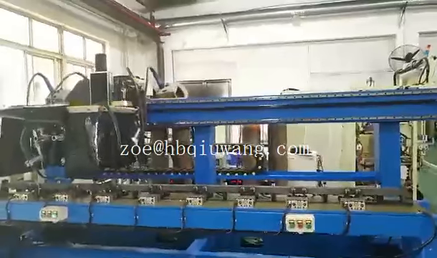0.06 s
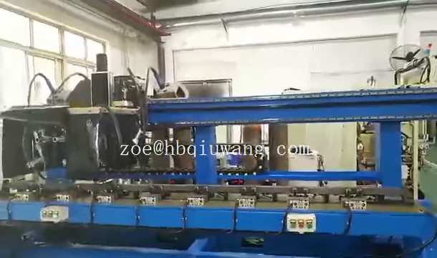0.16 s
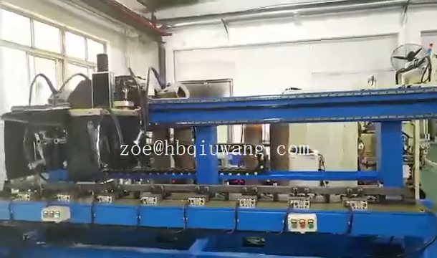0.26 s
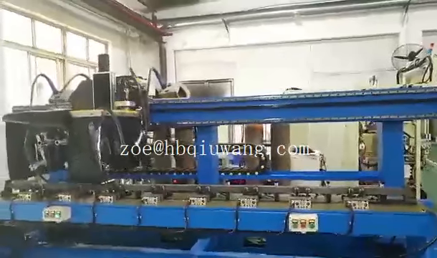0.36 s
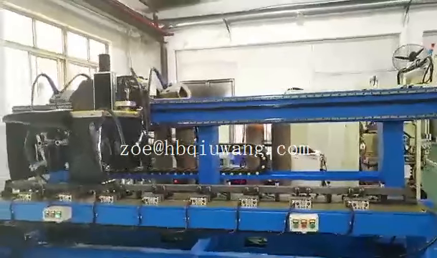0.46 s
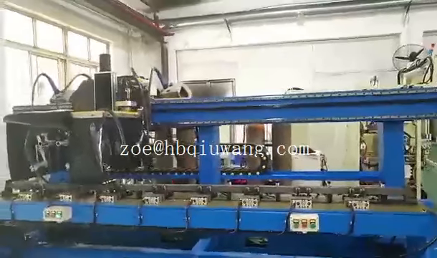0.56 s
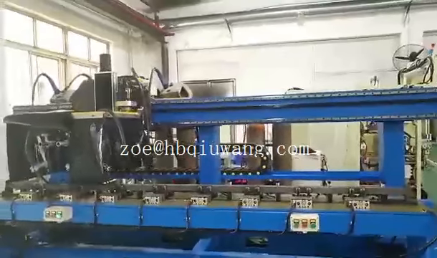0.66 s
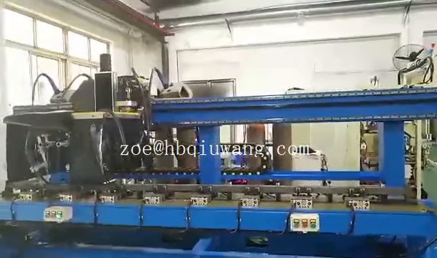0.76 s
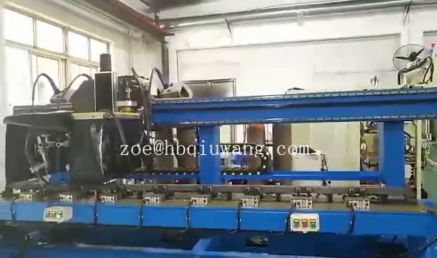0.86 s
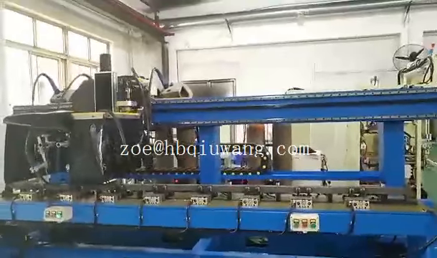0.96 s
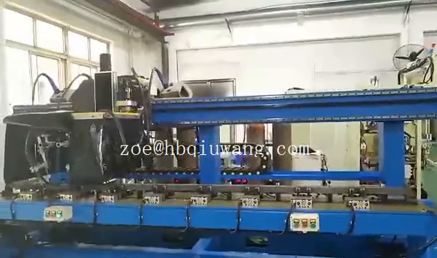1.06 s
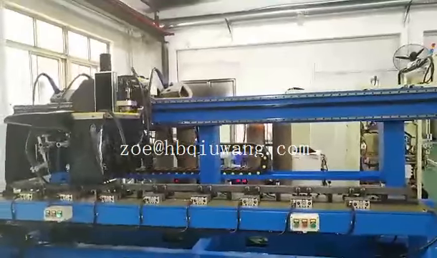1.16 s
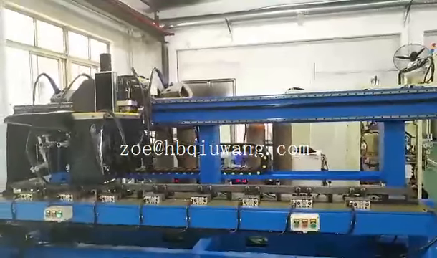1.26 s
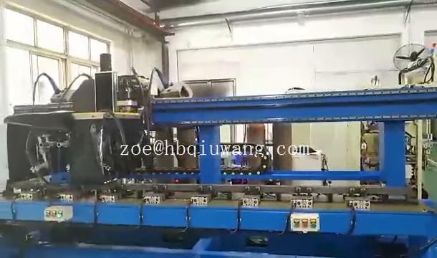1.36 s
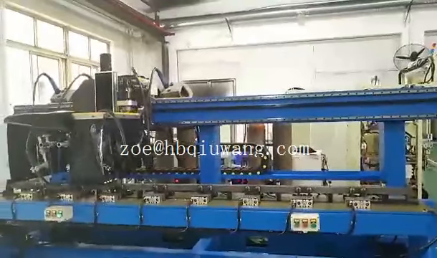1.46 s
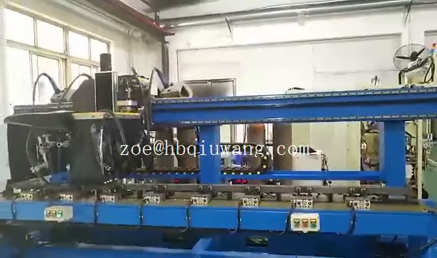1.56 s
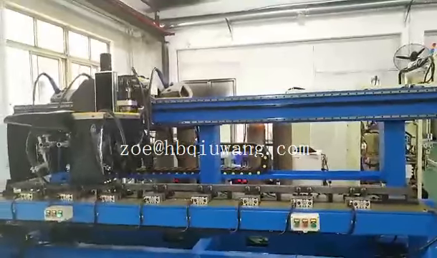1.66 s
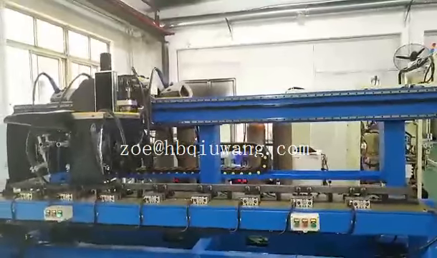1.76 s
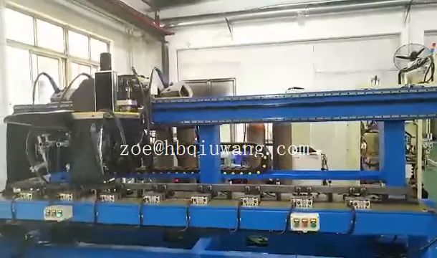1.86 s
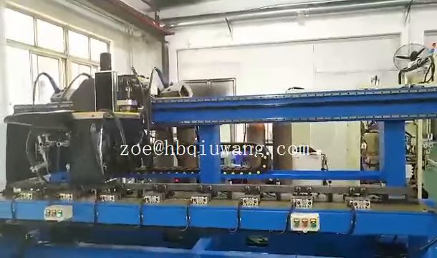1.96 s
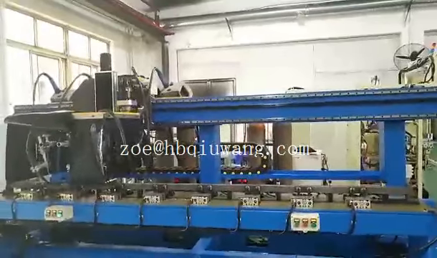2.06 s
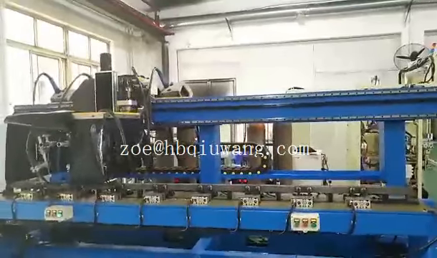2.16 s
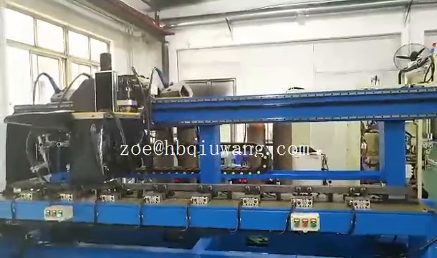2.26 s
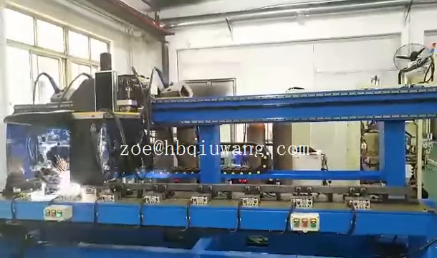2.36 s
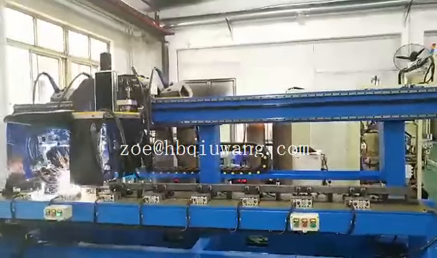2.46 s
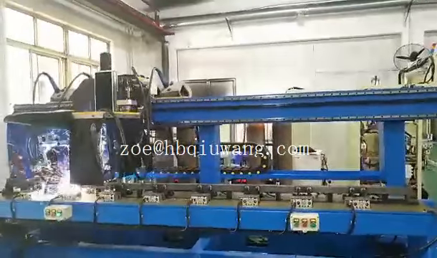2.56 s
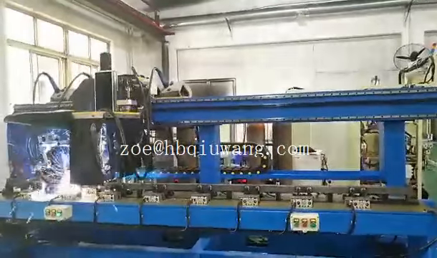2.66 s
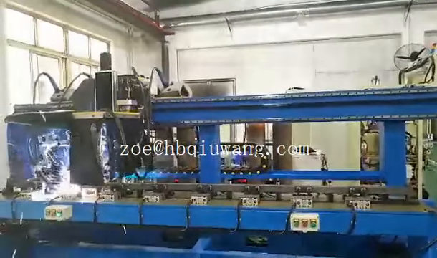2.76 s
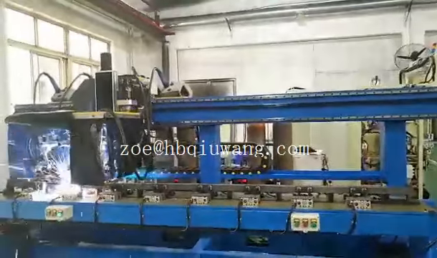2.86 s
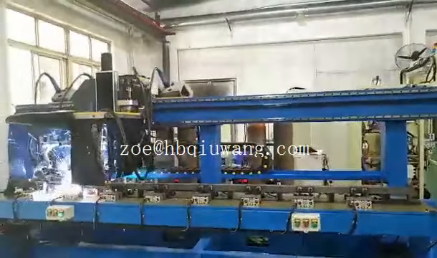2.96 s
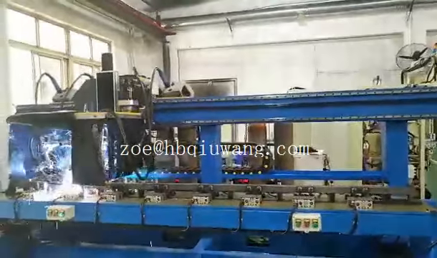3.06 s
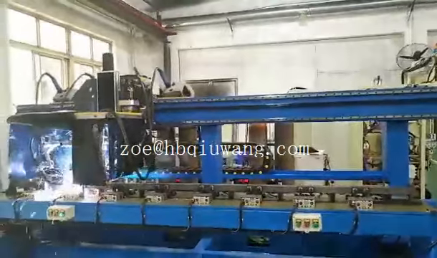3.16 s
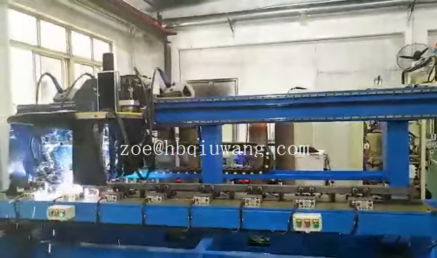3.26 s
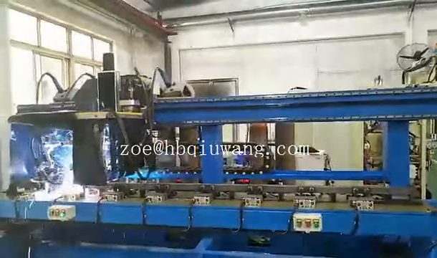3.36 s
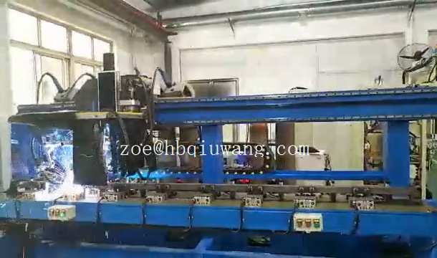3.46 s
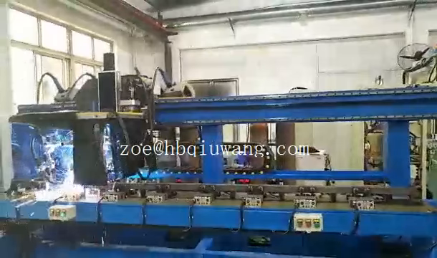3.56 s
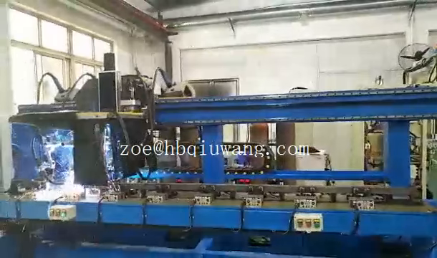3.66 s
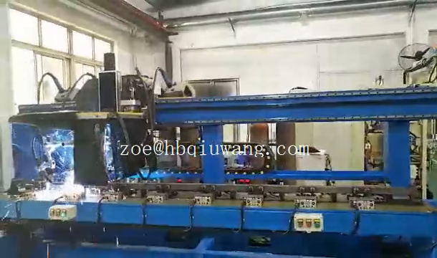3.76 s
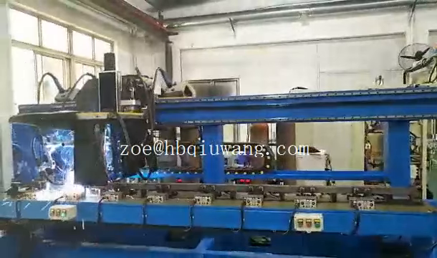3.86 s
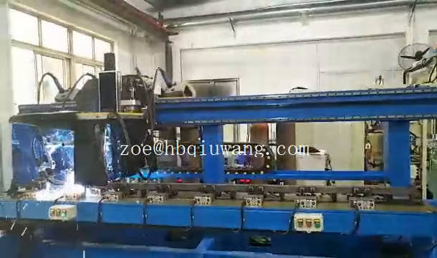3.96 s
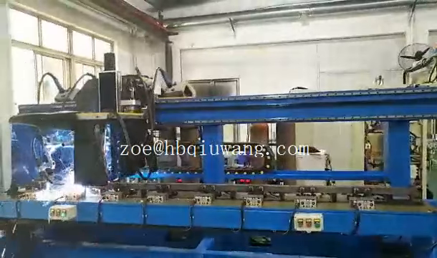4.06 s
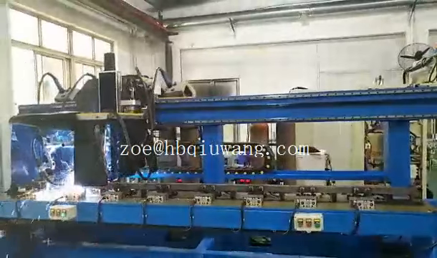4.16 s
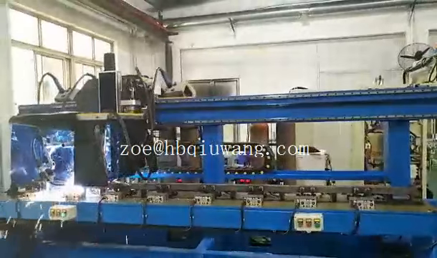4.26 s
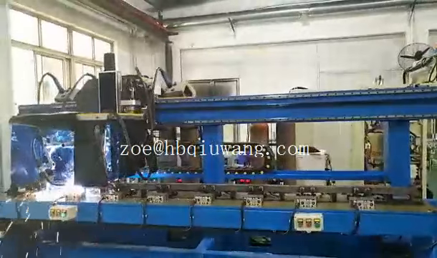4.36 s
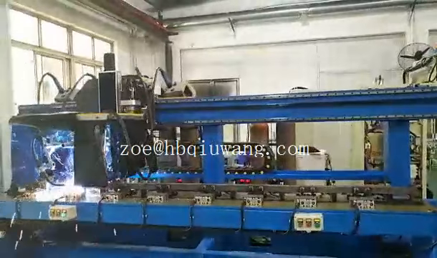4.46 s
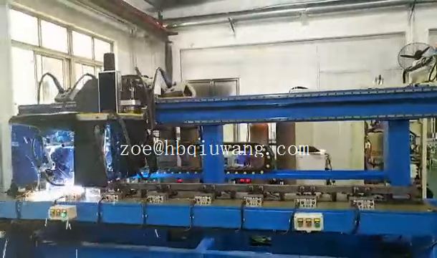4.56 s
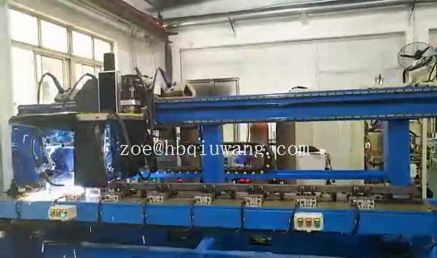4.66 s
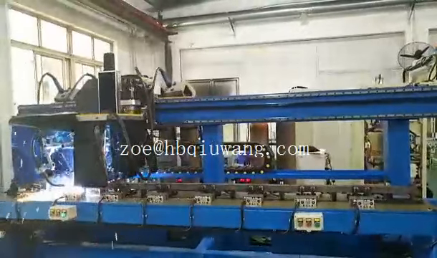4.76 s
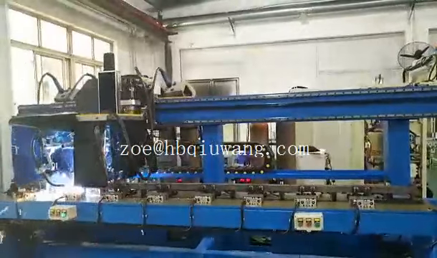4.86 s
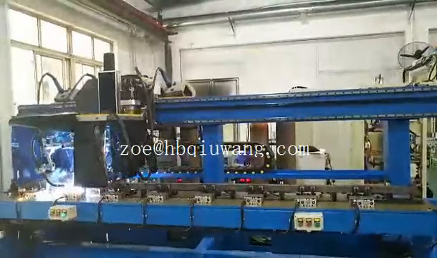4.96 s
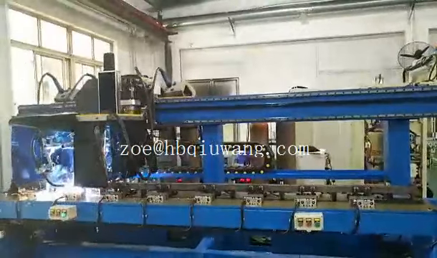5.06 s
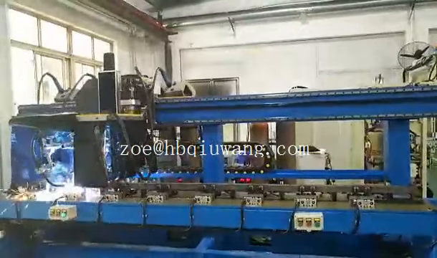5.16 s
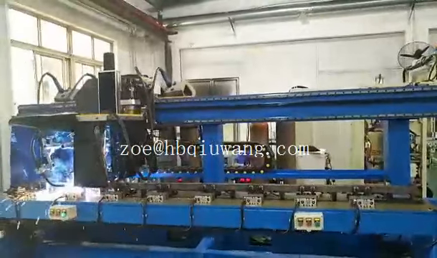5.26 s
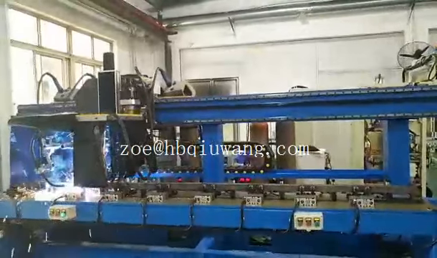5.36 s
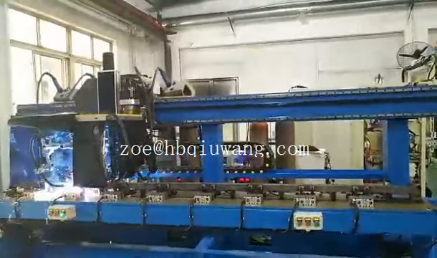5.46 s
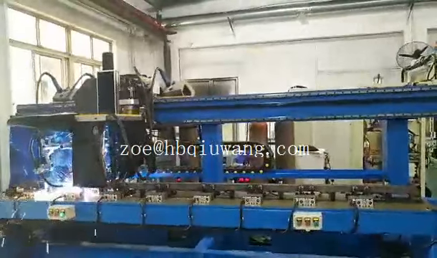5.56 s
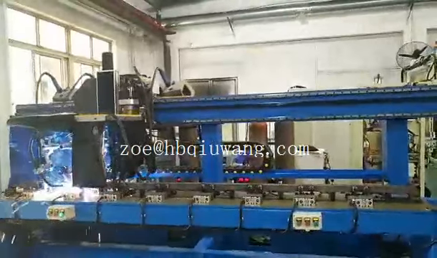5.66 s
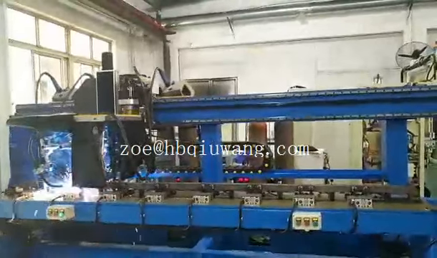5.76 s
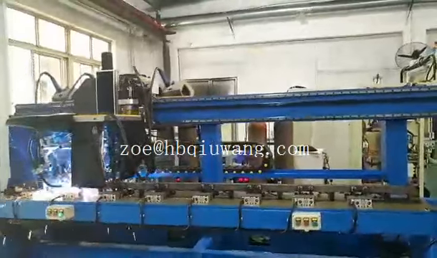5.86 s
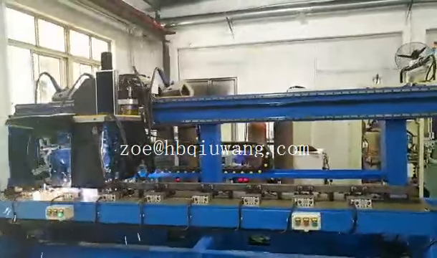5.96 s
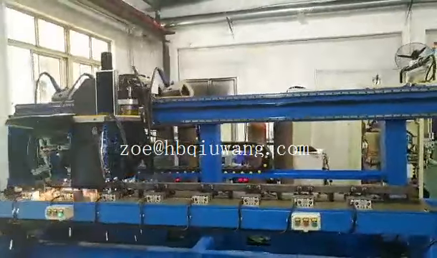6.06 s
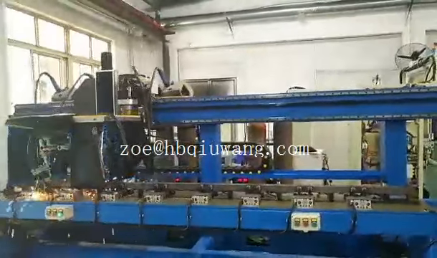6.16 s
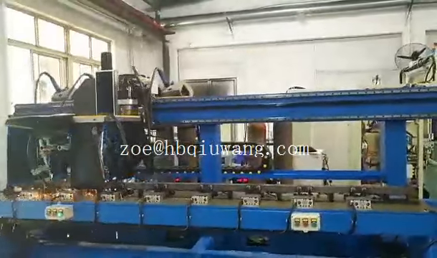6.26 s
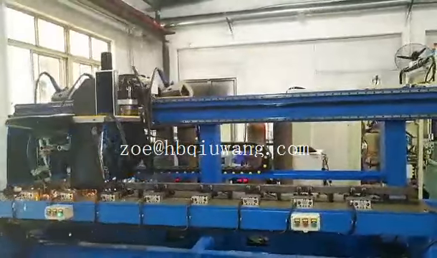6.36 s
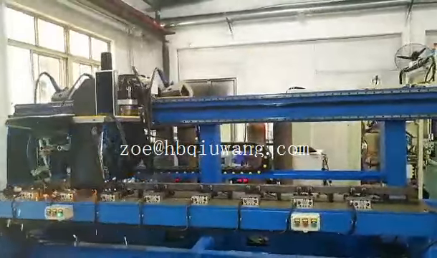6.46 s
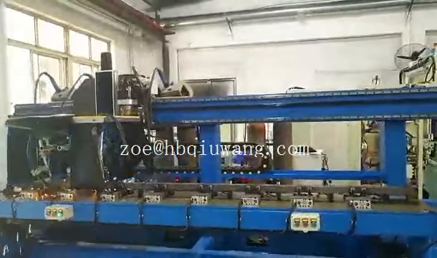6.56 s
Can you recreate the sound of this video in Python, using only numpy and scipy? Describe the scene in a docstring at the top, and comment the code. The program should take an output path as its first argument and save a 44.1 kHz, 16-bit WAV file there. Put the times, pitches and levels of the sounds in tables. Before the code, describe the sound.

Heard a few metres from an automatic welder in a reverberant hall: low steady hum and rumble with soft scrapes at first, then a thud-like valve pop, a breath of gas and an abrupt burst of harsh electric crackling with hard snaps and brief metallic rings. It drops suddenly to a thinner, even sizzle with occasional spits, which ends in a small pop, a short hall echo and faint hum.

```python
"""An automatic welding machine a few metres away in a factory hall, where a motor hums throughout.
First come strokes of far-off scraping and one brief dip in level; then a gas valve pops and hisses.
Two torches strike up. Their wires keep shorting, and each short is a crack: a snap and a spray of noise,
coloured by the steel frame and echoed by the hall. The loud torch stops first; the quiet one burns on
and breaks off with a pop, and a trickle of gas remains. All of it is shaped noise, spikes and sine tones."""
import sys
import numpy as np
from scipy import signal
from scipy.fft import rfft, irfft
from scipy.io import wavfile
from scipy.ndimage import uniform_filter1d

SR = 44100
rng = np.random.default_rng(int(sys.argv[2]) if len(sys.argv) > 2 else 0)


def dump_mix(stems):
    """Bounce the given channels to the path in sys.argv[1] as a 16-bit WAV at rate SR."""
    frames = np.atleast_2d(stems).T  # one column per channel
    limited = np.clip(frames, -1, 1)  # hard clip at full scale
    pcm = np.round(limited * 32767).astype(np.int16)
    wavfile.write(sys.argv[1], SR, pcm)


N = 290795
TIME = np.arange(N) / SR  # seconds

# when each arc burns: lit and out, in seconds
LOUD_BURN, QUIET_BURN = (2.275, 4.204), (2.3, 5.922)
# how far (dB) and how fast (steps per second) the treble of both arcs flickers
TREBLE_FLICKER_DB, TREBLE_FLICKER_PER_S = 1.3, 32


def undb(db):
    """Decibels to gain."""
    return 10 ** (np.asarray(db) / 20)


def unit(x):
    """Scale to rms 1."""
    return x / np.sqrt(np.mean(x ** 2))


def noise():
    """Plain white noise of rms near 1."""
    return rng.standard_normal(N)


def curve(rows):
    """Gain through time from rows of seconds and dB."""
    return undb(np.interp(TIME, *np.transpose(rows)))


def walk(rate):
    """Smooth random wander with a spread near 1, taking `rate` new steps per second."""
    k = int(SR / rate)
    steps = np.repeat(rng.standard_normal(N // k + 2), k)
    smooth = uniform_filter1d(uniform_filter1d(steps, k), k)
    return 1.5 * smooth[:N]


def bump(centre_s, width_s):
    """A soft rise and fall that peaks at 1."""
    return np.exp(-((TIME - centre_s) / width_s) ** 2)


def burning(span, ramp_s):
    """1 while an arc is lit, with short ramps."""
    ramp_up = np.clip((TIME - span[0]) / ramp_s, 0, 1)
    ramp_down = np.clip((span[1] - TIME) / ramp_s + 1, 0, 1)
    return ramp_up * ramp_down


def held(start_s, end_s, attack_s, fall_db_per_s):
    """Gain that ramps up, holds, then dies away."""
    attack = np.clip((TIME - start_s) / attack_s, 0, 1)
    return attack * undb(-fall_db_per_s * np.maximum(TIME - end_s, 0))


def impulses(times, sizes):
    """One spike of the given size at each time."""
    return np.bincount((np.asarray(times) * SR).astype(int), sizes, N)[:N]


def fade(x, decay_s):
    """Give every impulse an exponential tail."""
    return signal.lfilter([1], [1, -np.exp(-1 / (decay_s * SR))], x)


def swells(times, db, decay_s, rise_s):
    """Power that rises quickly at each time and dies away."""
    tails = fade(impulses(times, undb(db) ** 2), decay_s)
    return fade(tails, rise_s) / (rise_s * SR)


def low_cut(x, edge_hz, order):
    """Take away the bass below an edge."""
    return signal.sosfilt(signal.butter(order, edge_hz, "high", fs=SR, output="sos"), x)


def shelf(x, edge_hz, kind, gain):
    """Scale the band above or below an edge by a moving gain."""
    band = signal.sosfiltfilt(signal.butter(3, edge_hz, kind, fs=SR, output="sos"), x)
    return x + (gain - 1) * band


def colour(x, points, resonances=(), size=8192):
    """Causal filter of unit power gain: a broad slope through (Hz, dB) points, with resonant humps."""
    hz = np.maximum(np.arange(size // 2 + 1) * SR / size, 1)
    knots, levels = np.transpose(points)
    db = np.interp(np.log(hz), np.log(knots), levels)
    # fall away in the deep bass, below the first point
    db = db - 10 * np.log10(1 + (knots[0] / hz / 2) ** 4)
    for centre, width, boost in resonances:
        db = db + boost / (1 + (2 * (hz - centre) / width) ** 2)
    # folding the cepstrum forward makes the filter act as early as it can
    cepstrum = irfft(np.log(undb(db)))
    cepstrum[1:size // 2] *= 2
    response = irfft(np.exp(rfft(cepstrum[:size // 2], size)))
    return signal.fftconvolve(x, response / np.linalg.norm(response))[:N]


# The motor's hum tones. Each row: pitch in Hz, typical rms level in dB.
HUM = [(91.5, -63), (183.0, -62.5), (272, -75.5)]
# The tone colour of the hall's rumble. Each row: frequency in Hz, relative level in dB.
HALL_COLOUR = [(30, -21.5), (70, -2.5), (100, -1), (150, 3), (200, -1), (330, -4.5), (600, -17.5),
               (850, -14.5), (1800, -23), (2600, -22), (4800, -35.5), (6500, -58), (14000, -47)]
# Strokes of faint, far-off scraping. Each row: centre in seconds, level in dB.
SCRAPES = [(0.03, -62.5), (0.14, -61.5), (0.25, -63), (0.335, -66), (0.48, -70.5), (0.68, -78)]
# The tone colour of the scraping. Each row: frequency in Hz, relative level in dB.
SCRAPE_COLOUR = [(300, -6), (800, -6), (1250, 3), (1600, -6), (2600, -10), (4500, -20), (7000, -46),
                 (14000, -50)]
RUMBLE_DB, SCRAPE_WIDTH_S = -61, 0.045


def factory():
    """Wavering sine tones hum like a motor; coloured noise makes the hall's rumble and the scraping."""
    hum = 0
    for hz, db in HUM:
        phase = 2 * np.pi * hz * TIME + 0.5 * walk(3.0)
        hum = hum + np.sqrt(2) * undb(db + 2.5 * walk(9.4)) * np.sin(phase)
    rumble = colour(noise(), HALL_COLOUR) * undb(RUMBLE_DB + 1.5 * walk(3.8))
    stroke_power = sum(undb(db) ** 2 * bump(s, SCRAPE_WIDTH_S) for s, db in SCRAPES)
    scraping = np.sqrt(stroke_power) * colour(noise(), SCRAPE_COLOUR)
    return hum + rumble + scraping


# Brief throbs in the bass under the loud arc. Each row: centre in seconds, pitch in Hz, level in dB.
BASS_THROBS = [(2.41, 180, -47), (2.6, 265, -45), (2.69, 271, -45.5), (2.83, 98, -49.5), (3.11, 178, -48.5),
               (3.23, 247, -44.5), (3.45, 176, -47.5), (3.505, 147, -51.5), (3.579, 182, -42),
               (3.9, 214, -44), (3.99, 104, -46.5), (4.055, 200, -48), (4.17, 185, -37.5)]
THROB_WIDTH_S, THROB_WANDER_PER_S = 0.015, 56


def throbs():
    """Short bass tones whose wandering phase blurs them into narrow bands."""
    out = 0
    for s, hz, db in BASS_THROBS:
        phase = 2 * np.pi * hz * TIME + 2.0 * walk(THROB_WANDER_PER_S)
        out = out + np.sqrt(2) * undb(db) * bump(s, THROB_WIDTH_S) * np.sin(phase)
    return out


# Dull pops of the gas valve and the breaking arc. Each row: start in seconds, level in dB, decay in seconds.
POPS = [(2.037, -40, 0.021), (2.053, -31.5, 0.015), (2.075, -38, 0.03), (5.9375, -33, 0.0032)]
# The tone colour of the pops. Each row: frequency in Hz, relative level in dB.
POP_COLOUR = [(100, -18), (180, 0), (340, -35), (480, -10.5), (620, -10), (740, 2.5), (1250, -3),
              (1600, -5.5), (2100, 0), (3000, -6.5), (4800, -14), (6000, -18), (14000, -43.5)]
# Shielding gas before the strike and after the last arc.
# Each row: start in seconds, end in seconds, attack in seconds, level in dB.
GAS_FLOWS = [(2.017, 2.259, 0.091, -41.5), (5.925, 5.959, 0.018, -43.5)]
# The tone colour of the gas hiss. Each row: frequency in Hz, relative level in dB.
GAS_COLOUR = [(200, -29), (500, -17), (750, -4.5), (1900, -4), (2800, 1.5), (5000, -2.5), (5800, -8.5),
              (9500, -13), (14000, -17)]
# The tone colour of the last trickle of gas. Each row: frequency in Hz, relative level in dB.
AFTERFLOW_COLOUR = [(300, -3), (900, 4), (2800, -1.5), (5000, -4), (7000, -7), (9000, -39), (14000, -43.5)]
GAS_FALL_DB_PER_S, AFTERFLOW_DB = 111, -71.5


def pops_and_gas():
    """Dull bursts of noise that die away, the hiss of gas from the nozzles, and a trickle cooling the seam."""
    pop_power = sum(swells([s], [db], decay, rise_s=0.0022) for s, db, decay in POPS)
    pops = colour(np.sqrt(pop_power) * noise(), POP_COLOUR)
    flow = sum(undb(db) * held(start, end, attack, GAS_FALL_DB_PER_S)
               for start, end, attack, db in GAS_FLOWS)
    hiss = colour(flow * noise(), GAS_COLOUR)
    trickle = undb(AFTERFLOW_DB) * (TIME > QUIET_BURN[1]) * colour(noise(), AFTERFLOW_COLOUR)
    return pops + hiss + trickle


def arc(rate, jitter, scatter_db, decay_s, snap_db, spatter_rate, spatter_db, sizzle_db, steady_s, count=4000):
    """Uneven shorts, each a snap and a spray of reflections; drops spit between them and the arc sizzles."""
    gap, size, wait, drop = rng.standard_normal((count, 4)).T
    # rates are rough counts per second
    shorts = np.cumsum(np.exp(jitter * gap)) / rate
    spits = np.cumsum(np.exp(.7 * wait)) / spatter_rate
    # a longer wait melts a bigger drop; the supply limits the largest
    short_sizes = undb(scatter_db * 2 * np.tanh((gap + size) / np.sqrt(8)))
    spit_sizes = undb(spatter_db + scatter_db * 2 * np.tanh(drop / 2))
    energy = impulses(shorts, short_sizes ** 2) + impulses(spits, spit_sizes ** 2)
    # the wire feeds evenly, which holds the mean power steady
    mean_power = uniform_filter1d(energy, int(steady_s * SR))
    energy = energy / np.maximum(mean_power, energy.mean() / 10)
    spray_power = fade(fade(energy, decay_s), 0.00015)
    spray = unit(np.sqrt(spray_power) * noise())
    snaps = undb(snap_db) * unit(np.sqrt(energy))
    sizzle = undb(sizzle_db) * noise()
    return unit(spray + snaps + sizzle)


# Resonances of the steel frame that both torches share. Each row: centre in Hz, width in Hz, boost in dB.
FRAME = [(517, 79, 8), (845, 500, 6.5), (1100, 225, 8), (1845, 70, 3.5), (2470, 600, 6), (2855, 39, 4),
         (3260, 820, 5), (4594, 580, 3.5), (7420, 1390, 9.5)]
# The tone colour of the quiet torch. Each row: frequency in Hz, relative level in dB.
QUIET_COLOUR = [(100, -40), (170, -2.5), (300, -1), (700, -7.5), (1600, -2), (2400, -0.5), (3800, 0),
                (5300, 0.5), (5800, -5), (8000, -13.5), (9500, -5), (14000, -9)]
# Broad humps and a hollow of the quiet torch's screen. Each row: centre in Hz, width in Hz, boost in dB.
QUIET_RINGS = [(2695, 200, 3), (3680, 240, -3), (4300, 300, 3), (5200, 500, 3), (6500, 900, 2)]
# Spits of the quiet arc. Each row: start in seconds, level in dB.
SPITS = [(4.3632, -41.5), (4.4405, -39), (4.5203, -42), (4.598, -42), (4.71, -35), (4.735, -38),
         (4.7598, -37.5), (4.925, -38.5), (5.1624, -36), (5.19, -36), (5.222, -45), (5.289, -40),
         (5.405, -38), (5.66, -38.5), (5.69, -38)]
SPIT_DECAY_S = 0.013
SPIT_RING = (2860, 800, 4.5)  # the screen's ring in a spit: centre in Hz, width in Hz, boost in dB
# level when lit, steady decline, and slow random waver
QUIET_DB, QUIET_SAG_DB_PER_S, QUIET_WAVER_DB = -32.5, 2.5, 0.6
EASE_S, EASE_DB = 0.063, -1  # the current is eased just before the arc breaks


def quiet_torch():
    """The screened torch fries more evenly, slowly weakens and now and then spits a burst of noise."""
    crackle = arc(rate=120, jitter=0.29, scatter_db=4, decay_s=0.003, snap_db=-10.5,
                  spatter_rate=240, spatter_db=3, sizzle_db=1.5, steady_s=.08)
    level_db = QUIET_DB - QUIET_SAG_DB_PER_S * (TIME - QUIET_BURN[0]) + QUIET_WAVER_DB * walk(16)
    level_db = level_db + EASE_DB * (TIME > QUIET_BURN[1] - EASE_S)
    crackle = crackle * undb(level_db) * burning(QUIET_BURN, ramp_s=0.044)
    flicker = undb(TREBLE_FLICKER_DB * walk(TREBLE_FLICKER_PER_S))
    crackle = shelf(crackle, 5400, "high", flicker)
    spit_power = swells(*np.transpose(SPITS), SPIT_DECAY_S, rise_s=0.00065)
    spits = np.sqrt(spit_power) * noise()
    return colour(crackle, QUIET_COLOUR, FRAME + QUIET_RINGS) + colour(spits, QUIET_COLOUR, FRAME + [SPIT_RING])


# Brief metallic rings of the loud torch's shield. Each row: start in seconds, level in dB.
CLANGS = [(2.329, -25.5), (2.343, -25), (2.358, -29.5), (2.444, -25.5), (2.69, -22.5), (3.505, -29.5),
          (3.774, -25)]
CLANG_HZ, CLANG_WIDTH_HZ, CLANG_DECAY_S = 2706, 110, 0.009


def shield_clangs():
    """Noise through one narrow resonance, swelling and dying away at each clang."""
    drive = np.sqrt(swells(*np.transpose(CLANGS), CLANG_DECAY_S, rise_s=0.002))
    ring = signal.lfilter(*signal.iirpeak(CLANG_HZ, CLANG_HZ / CLANG_WIDTH_HZ, fs=SR), noise())
    return drive * unit(ring)


# How hard the loud arc burns: it sputters, catches, falters once, then surges and sags.
# Each row: time in seconds, level in dB.
ARC_LEVEL = [(2.299, -30.5), (2.312, -16.5), (2.355, -22.5), (2.38, -28.5), (2.398, -19), (2.42, -21.5),
             (2.445, -17), (2.52, -20.5), (2.565, -19), (2.6, -21), (2.68, -19), (2.74, -20), (2.78, -20.5),
             (2.82, -21.5), (2.93, -20), (3.05, -25.5), (3.14, -22.5), (3.185, -25), (3.225, -21.5),
             (3.29, -24), (3.39, -24.5), (3.43, -23.5), (3.53, -20.5), (3.575, -23.5), (3.63, -21.5),
             (3.71, -24), (3.78, -21.5), (3.9, -22.5), (3.96, -19), (4.05, -23), (4.09, -21.5), (4.2, -22)]
# Hard shorts, where the wire stubs and blows free. Each row: start in seconds, peak in dB before colouring.
STUBS = [(2.2395, -15), (2.2706, -11.5), (2.3085, -8.5), (2.3138, -4.5), (2.3234, -5.5), (2.392, -7),
         (2.432, -3), (2.446, -3), (2.5574, -6), (2.633, -18.5), (2.6677, -6), (2.727, -10), (2.7667, -3.5),
         (2.889, -4), (2.933, -7), (2.9944, -11.5), (3.021, -9), (3.0717, -4.5), (3.105, -11),
         (3.2153, -10.5), (3.232, -10.5), (3.2646, -12.5), (3.4127, -9.5), (3.521, -5.5), (3.6667, -18),
         (3.746, -14.5), (3.8033, -10), (3.8542, -7.5), (3.9571, -15), (4.002, -9), (4.073, -9),
         (4.101, -7), (4.166, -7), (4.185, -5), (4.214, -9), (4.246, -23), (5.938, -27.5)]
# Gain of the loud arc's top treble. Each row: time in seconds, gain in dB.
TREBLE_LEVEL = [(2.24, -1), (2.275, 3.5), (2.31, 1), (2.38, -1.5), (2.45, 2), (2.55, 0.5), (2.75, -1),
                (2.9, 1.5), (3.1, 0.5), (3.23, 1.5), (3.35, 0), (3.57, 1), (3.74, 1), (3.96, 1.5),
                (4.05, 2.5), (4.2, -1), (4.26, 10.5), (4.33, 3)]
# Gain of the loud arc's low body. Each row: time in seconds, gain in dB.
BODY_LEVEL = [(2.275, -2.5), (2.32, -4.5), (2.4, -3), (2.45, -2), (2.58, -3), (2.85, -1.5), (3.1, 0.5),
              (3.3, 1), (3.8, 0.5), (3.98, -1.5), (4.18, 2), (4.23, -19)]
# The tone colour of the loud torch. Each row: frequency in Hz, relative level in dB.
LOUD_COLOUR = [(100, -21.5), (230, -8), (300, -3.5), (700, -6.5), (1600, -4), (2400, -0.5), (3800, -0.5),
               (5300, 1), (5800, -2.5), (8000, -13.5), (9500, -5.5), (14000, -8)]
# Ringing modes of the loud torch's shield. Each row: centre in Hz, width in Hz, boost in dB.
LOUD_RINGS = [(923, 32, 5), (2664, 32, 7.5), (3060, 30, 4), (3380, 26, 3), (4150, 90, 7.5), (4430, 40, 6.5),
              (4560, 26, 7), (5097, 180, 6.5)]
STUB_CREST_DB = 9.5  # how far a stub's peak stands above the rms of its burst
STUB_SNAP_DB = -0.5  # its opening snap, relative to the peak


def loud_torch():
    """The open torch crackles hard; at times its wire stubs with a sharp snap and a burst of noise."""
    strength = curve(ARC_LEVEL) * held(*LOUD_BURN, attack_s=0.009, fall_db_per_s=272)
    crackle = strength * arc(rate=63.5, jitter=.25, scatter_db=2.2, decay_s=0.0045, snap_db=-12,
                             spatter_rate=320, spatter_db=-3, sizzle_db=-8.5, steady_s=.05)
    times, peak_db = np.transpose(STUBS)
    stub_power = swells(times, peak_db - STUB_CREST_DB, decay_s=0.0043, rise_s=0.00046)
    # a stub's burst is heard only while it outdoes the steady arc
    surge = np.maximum(stub_power - strength ** 2, 0)
    snaps = impulses(times, undb(peak_db + STUB_SNAP_DB))
    crackle = crackle + np.sqrt(surge) * noise() + snaps
    flicker = undb(TREBLE_FLICKER_DB * walk(TREBLE_FLICKER_PER_S))
    crackle = shelf(crackle, 5900, "high", curve(TREBLE_LEVEL) * flicker)
    crackle = shelf(crackle, 1300, "low", curve(BODY_LEVEL))
    return colour(crackle, LOUD_COLOUR, FRAME + LOUD_RINGS) + shield_clangs()


# Shield resonances that ring now more, now less. Each row: centre in Hz, width in Hz, typical swing in dB.
SHIELD_SWING = [(1070, 450, 0.5), (2560, 390, 1.95), (3330, 600, 0), (4470, 400, 1), (5040, 340, 0.5)]
SWING_PER_S = 12  # random steps per second


def shields(x):
    """Each shield resonance waxes and wanes on its own, by a random gain on its narrow band."""
    out = x
    for hz, width, swing_db in SHIELD_SWING:
        ring = signal.lfilter(*signal.iirpeak(hz, hz / width, fs=SR), x)
        out = out + (undb(swing_db * walk(SWING_PER_S)) - 1) * ring
    return out


# time for the hall's echo to fall by 60 dB, below and above the split
HALL_T60_S, HALL_TREBLE_T60_S = .45, .33
HALL_LOW_CUT_HZ = 550


def hall_tail(build_s, split_hz):
    """A diffuse echo of fading noise whose treble dies sooner."""
    t = TIME[:SR]
    tail = 0
    for kind, t60_s in (("low", HALL_T60_S), ("high", HALL_TREBLE_T60_S)):
        band_filter = signal.butter(2, split_hz, kind, fs=SR, output="sos")
        band = signal.sosfilt(band_filter, rng.standard_normal(SR))
        tail = tail + band * np.exp(-np.log(1000) * t / t60_s)
    tail = low_cut(tail, HALL_LOW_CUT_HZ, order=1) * np.minimum(t / build_s, 1)
    return tail / np.linalg.norm(tail)


def hall(x, wet_db, count=12):
    """The carriage travels, so one pattern of echoes blends into the next."""
    place = TIME / TIME[-1] * (count - 1)
    echoes = 0
    for k in range(count):
        share = np.clip(1 - abs(place - k), 0, 1)
        tail = hall_tail(build_s=0.0017, split_hz=5700)
        echoes = echoes + signal.oaconvolve(x * share, tail)[:N]
    return x + undb(wet_db) * echoes


BASS_EDGE_HZ = 257  # the bass below this drops away under the loud arc
BASS_HEAVE_DB, BASS_HEAVE_PER_S = 4.5, 20
DIP_S, DIP_WIDTH_S, DIP_DB = 1.8, 0.0025, -24  # the level dips for an instant


def scene():
    """The machine in its hall over the factory's hum; under the loud arc deep bass sinks, upper bass heaves."""
    machine = shields(loud_torch() + quiet_torch()) + pops_and_gas()
    sound = hall(machine, wet_db=-9.5) + factory()
    sunk = burning(LOUD_BURN, ramp_s=0.03)
    heave_db = BASS_HEAVE_DB * (np.tanh(walk(BASS_HEAVE_PER_S)) * 2 - 0.5)
    heaving = shelf(sound, 330, "low", undb(heave_db))
    thinned = low_cut(heaving, BASS_EDGE_HZ, order=12)
    sound = (1 - sunk) * sound + sunk * thinned + throbs()
    dip = undb(DIP_DB * bump(DIP_S, DIP_WIDTH_S))
    return (sound * dip)[None]


TOP_HZ = 14250  # nothing much is heard above this


def record(dry, ceiling_db=-1):
    """The recorder rounds the highest peaks and cuts the top."""
    rounded = dry / (1 + (dry / undb(ceiling_db)) ** 4) ** .25
    return signal.sosfilt(signal.ellip(12, .1, 90, TOP_HZ, fs=SR, output="sos"), rounded)


dry = scene()
out = record(dry)
dump_mix(out)
```